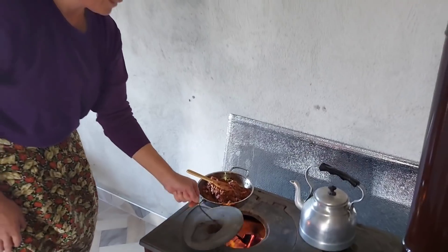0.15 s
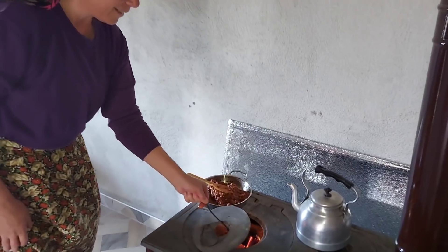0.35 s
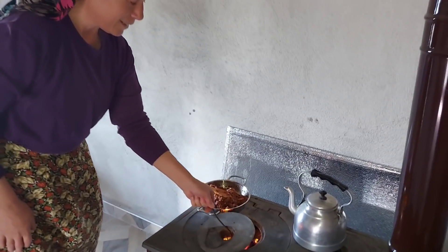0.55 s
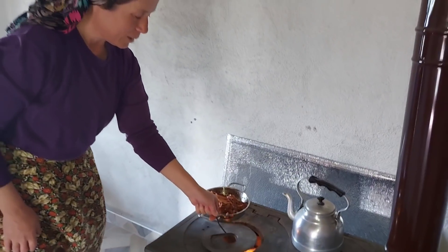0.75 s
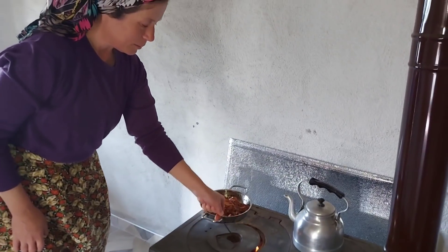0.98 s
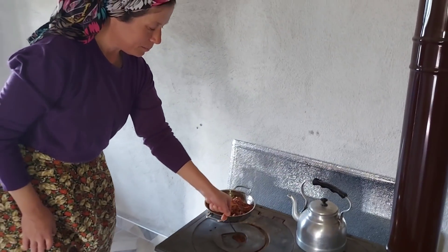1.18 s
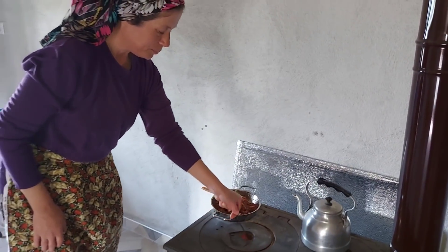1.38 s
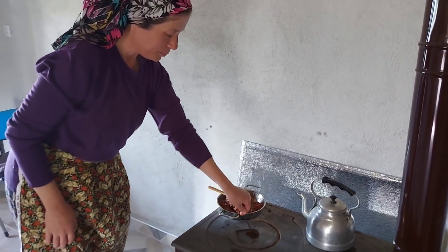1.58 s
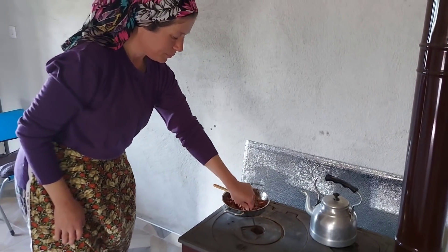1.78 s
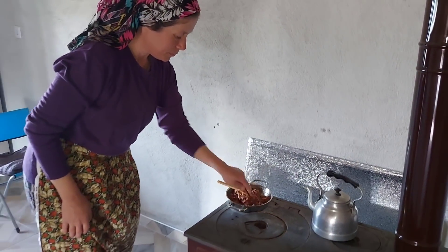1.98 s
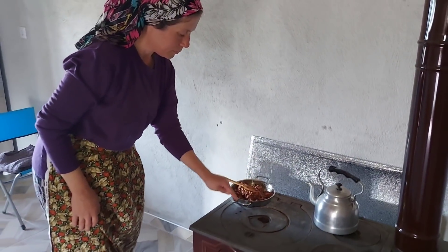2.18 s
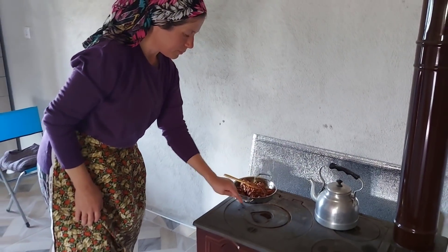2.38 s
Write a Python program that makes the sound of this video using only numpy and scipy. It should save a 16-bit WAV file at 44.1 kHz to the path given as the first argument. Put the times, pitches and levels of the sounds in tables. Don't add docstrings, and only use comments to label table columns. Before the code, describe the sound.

Loud rough iron scraping with one sharp bright clang and a run of lower knocks as a stove lid drops home, then faint metal touches and a short double pan knock, in a small reverberant room, miked nearby.

```python
import sys
import numpy as np
from scipy import signal
from scipy.fft import rfft, irfft, next_fast_len
from scipy.io import wavfile
from scipy.ndimage import uniform_filter1d

SR = 44100
rng = np.random.default_rng(int(sys.argv[2]) if len(sys.argv) > 2 else 0)


def invert_db(x):
    u = np.asarray(x, float) / 20
    return 10 ** u


def put_to_file(sound):
    columns = np.atleast_2d(sound).T
    safe = np.clip(columns, -1, 1)
    whole_steps = np.round(safe * 32767)
    wavfile.write(sys.argv[1], SR, whole_steps.astype(np.int16))


N = 108045
T = np.arange(N) / SR

# frequency in Hz, level in dB.
FIRE_SPECTRUM = [(50, 3), (120, 2), (320, -3.5), (500, -15.5), (1100, -33), (4000, -53.5), (12500, -43),
                 (16300, -58)]
FIRE_DB, FIRE_FADE_DB_PER_S = -51, -7
# start in seconds, level in dB.
TICKS = [
    (1.5727, -66),
    (1.7862, -63),
    (2.084, -76),
]
# start in seconds, level in dB, rise in seconds, hold in seconds,
# brightness in dB per octave.
HOOK_RUBS = [
    (1.62, -74, 0.014, 0.06, 14.5),
    (1.695, -68.5, 0.0049, 0.024, -1.5),
    (1.8, -64, 0.01, 0.0554, 2),
    (1.93, -73.5, 0.0039, 0.024, 8),
]
# frequency in Hz, width in Hz, level in dB.
HOOK_MODES = [(1066, 27.4, 4), (2080, 11.6, -0.5), (2040, 34, -6.5), (2460, 17, -9), (3960, 30, -19.5),
              (4370, 55, -16), (4340, 26, -7.5), (5006, 8.6, -15.5), (5810, 40, -10), (7500, 87, -19),
              (11800, 240, -20)]
# start in seconds, level in dB, rise in seconds, hold in seconds,
# brightness in dB per octave.
PAN_NUDGES = [
    (2.183, -75.5, 0.0099, 0.028, -5),
    (2.235, -86, .02, 0.0745, -5),
    (2.338, -63, 0.005, .012, 1.5),
    (2.3565, -46.5, 0.00044, 0.0065, 12.5),
    (2.371, -43, 0.0041, .002, 13.5),
    (2.378, -36.5, 0.00087, 0.0077, -3.5),
    (2.392, -34.5, 0.0012, 0.0053, -6.5),
    (2.408, -57, 0.003, .008, -21),
    (2.43, -50, 0.0036, .03, -17),
]
# frequency in Hz, width in Hz, level in dB.
PAN_MODES = [(845, 87, -7), (1410, 70, -31), (2074, 34, 0), (2610, 22, 5.5), (3768, 40, 7),
             (4230, 53, -0.5), (4840, 26, -4), (5840, 72, 3.5), (7860, 120, -13.5), (8200, 67, -10),
             (10170, 100, -14), (11850, 110, -17)]
# frequency in Hz, level in dB.
PAN_SCRAPE = [(240, -39), (400, -29.5), (3200, -15.5), (5680, -7.5), (15600, -25.5), (16300, -7)]
PAN_SCRAPE_DB, RELEASE_S = 1, 0.0034
HOOK_WIDEN, PAN_WIDEN = 6, 5

# time in seconds, boom of the box in dB, weight on the plate in dB,
# grit under the edge in dB.
DRAG = [(0, -63, -47, -61), (.07, -45, -50.5, -64), (.12, -32.5, -44, -87), (0.191, -32.5, -27, -40),
        (0.238, -56, -26.5, -39.5), (.3, -35.5, -22.5, -55), (0.419, -25.5, -28.5, -37.5),
        (.6, -43.5, -38.5, -55.5), (.7, -48, -38, -58), (0.768, -37.5, -28, -44.5), (.86, -37, -31.5, -86),
        (0.93, -33.5, -26.5, -33), (1.021, -38, -52, -52.5), (1.122, -52, -47, -77),
        (1.188, -34.5, -40, -45), (1.324, -41, -42, -58), (1.399, -49.5, -57, -104.5),
        (1.552, -52, -61.5, -80.5)]
GRAINS_PER_S, GRAIN_SPREAD_DB, LIFT_DB_PER_S = 2500, 5, 60
# start in seconds,
# clang in dB, extra brightness in dB, thud in dB, thud pitch in Hz.
CATCHES = [(0.069, -42, 4, -40.5, 596), (0.085, -46.5, 3, -20.5, 590), (0.123, -29.5, 5.5, -24, 747),
           (.31, -4.5, 11, -13.5, 595), (0.474, -35, 13.5, -23, 680), (0.541, -35.5, 5.5, -54.5, 394),
           (0.654, -38.5, 10, -26.5, 970), (0.691, -41, 12.5, -25, 980), (0.711, -28, -12, -30.5, 910),
           (0.745, -22.5, -2, -40.5, 890), (0.783, -18.5, 8.5, -30.5, 284), (0.8788, -16, 2.5, -23, 280),
           (0.926, -14.5, 5.5, -18.5, 280), (1.022, -48.5, -6.5, -19, 280), (1.164, -49, -15, -46.5, 501),
           (1.18, -25, -20, -28, 880), (1.205, -29, -32, -24, 288), (1.404, -48.5, -15.5, -38, 398),
           (2.187, -57.5, -5, -49.5, 628), (2.249, -69.5, 5.5, -47.5, 485)]
CHATTER_S, BRIGHT_HZ = .0075, 6700
THUD_S, THUD_SPREAD_OCT = 0.011, 0.36
# frequency in Hz, level in dB, t60 in seconds.
STOVE_MODES = [(70, -13.5, 0.23), (99.6, -6, 0.63), (137.9, 1.5, .1), (188, -19.5, 0.073),
               (248, -19, 0.031), (280, 1, 0.098), (355, 1, 0.028), (422.7, -7, 0.062), (590, -11.5, 0.06),
               (674, -8, 0.02), (865, 2, 0.016), (901.4, -14.5, 0.048), (1044, -7, 0.039),
               (1380, -5.5, 0.016)]
BOX_TOP_HZ = 210
# frequency in Hz, level in dB.
RASP_SPECTRUM = [(150, -27.5), (350, 2), (700, -1.5), (1300, -6.5), (2500, -12), (5000, -38.5)]
RASP_DB = -9.5
# start in seconds, level in dB, frequency in Hz, t60 in seconds.
BITES = [(.004, -37.5, 574, 0.022), (.04, -47, 594, 0.058), (.073, -55, 4600, 0.017),
         (.125, -40.5, 11550, .02), (.3105, -17, 9190, 0.031), (.312, -13, 4450, .03),
         (.314, -16.5, 2860, 0.017), (.312, -21.5, 1710, 0.027), (.312, -25.5, 10200, 0.032),
         (.48, -58, 3440, .04), (.542, -38, 8920, 0.05), (.655, -39, 12660, 0.036),
         (.69, -31.5, 882, 0.035), (.784, -18.5, 3450, 0.01), (.786, -26, 1590, 0.022),
         (.788, -32, 5540, 0.024), (.881, -29.5, 2040, 0.026), (.882, -35, 4130, 0.036),
         (.927, -22.5, 2380, 0.016), (.928, -17.5, 4030, 0.0067), (.945, -28, 1935, 0.047),
         (.965, -27, 1660, 0.022), (1.182, -34.5, 2060, 0.022), (1.27, -46, 869, .04),
         (1.31, -41, 1720, 0.034), (2.2, -50, 652, .06), (2.24, -52.5, 656, 0.041), (2.285, -51, 640, .06),
         (2.205, -46.5, 385, .08), (2.25, -45.5, 389, 0.056), (1.182, -35, 880, 0.051),
         (.783, -21, 3960, .002), (.927, -20, 2960, 0.0012), (.79, -21.5, 285.4, 0.18)]
BITE_S = 0.0047
# frequency in Hz, level in dB, t60 in seconds.
METAL_MODES = [(1647, -12, .1), (2020, -12, .1), (2283, -11, .1), (2875, -8, .1), (3413, -8, .1),
               (3520, -9, .1), (3941, -10, .1), (4407, -9, .08), (4742, -8, .12), (5577, -4, .12),
               (5830, -8, .1), (7407, -9, .1), (8083, -6, .12), (8995, 0, .1),
               (9950, -3, .07), (10350, -6, .07), (10690, -10, .07), (10975, -8, .08), (11430, -10, .08),
               (12125, -5, .1), (13200, -8, .08), (13920, -11, .06), (14300, -8, .09), (15480, -6, .12)]
LID_RING_DB, GRIT_RING_DB = -15, -20
# frequency in Hz, level in dB.
CLANG_SPECTRUM = [(400, -13), (800, -4), (2100, -3.5), (3100, -7.5), (4400, -5), (6600, -14.5), (9500, -19),
                  (16300, -26.5)]
WANDER_DB, WANDER_HZ = 3, 16

# frequency in Hz, t60 in seconds.
ROOM_T60 = [(60, 0.12), (300, 0.63), (1000, 0.54), (4000, 0.21), (14000, 0.215)]
# frequency in Hz, side against mid in dB.
WIDTH = [(60, -21.5), (200, -14), (500, -6.5), (1000, 0), (12000, -0.5)]
ROOM_DB, ROOM_GAP_S = 4.5, 0.0019
PLACES, PLACE_S, EVEN_HZ = 4, .07, 50
LEFT_LAG_S, LEFT_DB = 0.000098, -0.44
# frequency in Hz, level in dB.
PORTS = [(60, 1), (130, -0.5), (290, 2), (640, 1), (1410, 4), (3100, -1), (6820, -1), (15000, 4.5)]
MIC_LOW_HZ, MIC_TOP_HZ, PEAK_LIMIT = 54, 16150, .86


def rms_one(x):
    return x / np.sqrt(np.mean(x ** 2) + 1e-20)


def at_hz(points, hz):
    p = np.array(points)
    return np.interp(np.log(np.maximum(hz, 1)), np.log(p[:, 0]), p[:, 1])


def colour(x, spectrum):
    size = next_fast_len(N + 4096)
    gain = invert_db(at_hz(spectrum, np.fft.rfftfreq(size, 1 / SR)))
    return irfft(rfft(x, size) * rms_one(gain), size)[..., :N]


def drift(rate_hz):
    r = np.exp(-2 * np.pi * rate_hz * 40 / SR)
    white = rng.standard_normal(N // 40 + 2002)
    slow = signal.lfilter([1], [1, -2 * r, r * r], white)[2000:]
    return np.interp(np.arange(N) / 40, np.arange(len(slow)), rms_one(slow))


def wander():
    return invert_db(WANDER_DB * drift(WANDER_HZ))


def ring(x, hz, t60):
    r = invert_db(-60 / (max(t60, .0005) * SR))
    w = 2 * np.pi * hz / SR
    return signal.lfilter([0, np.sin(w)], [1, -2 * r * np.cos(w), r * r], x + 1e-18)


def grains():
    size_db = GRAIN_SPREAD_DB * np.minimum(rng.exponential(1, N), 4)
    sizes = invert_db(size_db) * rng.choice([-1, 1], N)
    return rms_one(sizes * (rng.random(N) < GRAINS_PER_S / SR))


def spread(mid, side):
    size = next_fast_len(len(mid) + 4096)
    width = invert_db(at_hz(WIDTH, np.fft.rfftfreq(size, 1 / SR)))
    side = irfft(rfft(side, size) * width, size)[:len(mid)]
    return np.array([mid + side, mid - side])


def fire():
    mid, side = colour(rng.standard_normal((2, N)), FIRE_SPECTRUM)
    flicker_db = 1.5 * drift(12.0)
    fade_db = FIRE_FADE_DB_PER_S * (np.clip(T, 1.3, 2.05) - 2)
    return invert_db(FIRE_DB + fade_db + flicker_db) * spread(mid, side)


def ticks():
    snaps = np.zeros(N)
    for s, db in TICKS:
        snaps[int(s * SR)] = invert_db(db + 9.5)
    return np.diff(ring(snaps, 11740, 0.002) + ring(snaps, 8020, 0.001) * .5, prepend=0)


def rubbed(strokes, modes, widen):
    rub = rng.standard_normal(N) + .5 * grains()
    envelopes = []
    for s, db, rise_s, hold_s, tilt_db in strokes:
        attack = np.clip((T - s) / rise_s, 0, 1)
        release = np.clip((s + rise_s + hold_s - T) / RELEASE_S + 1, 0, 1)
        envelopes.append((invert_db(db) * attack * release, tilt_db))
    rings = 0
    for hz, width_hz, db in modes:
        force = sum(e * invert_db(tilt_db * np.log2(hz / 2500)) for e, tilt_db in envelopes)
        t60 = 2.2 / (width_hz * widen)
        rings = rings + invert_db(db - 24) * ring(rub * force, hz, t60)
    return rings, rub * sum(e for e, _ in envelopes)


def hook():
    rings, _ = rubbed(HOOK_RUBS, HOOK_MODES, HOOK_WIDEN)
    return invert_db(3.5) * rings


def pan():
    rings, rub = rubbed(PAN_NUDGES, PAN_MODES, PAN_WIDEN)
    return rings + invert_db(PAN_SCRAPE_DB) * colour(rub, PAN_SCRAPE)


def dragged(column):
    rows = np.array(DRAG)
    level_db = np.interp(T, rows[:, 0], rows[:, column])
    return invert_db(level_db - LIFT_DB_PER_S * np.maximum(T - rows[-1, 0], 0))


def bursts(levels_db, decay_s):
    starts = np.full(N, 1e-18)
    starts[(np.array(CATCHES)[:, 0] * SR).astype(int)] = invert_db(levels_db)
    return signal.lfilter([1], [1, -np.exp(-1 / (decay_s * SR))], starts)


def stove():
    *_, thud_db, thud_hz = np.transpose(CATCHES)
    box, plate = (dragged(column) * grains() for column in (1, 2))
    noise = rng.standard_normal(N)
    out = invert_db(RASP_DB) * colour(plate, RASP_SPECTRUM)
    for hz, db, t60 in STOVE_MODES:
        off_pitch_db = 6 * (np.log2(hz / thud_hz) / THUD_SPREAD_OCT) ** 2
        thud = noise * bursts(thud_db - db - off_pitch_db, THUD_S)
        weight = box if hz < BOX_TOP_HZ else plate
        out = out + ring((weight * wander() + thud) * invert_db(db - 30), hz, t60)
    return out


def bites():
    noise = rng.standard_normal((len(BITES), SR // 20)) * np.exp(-T[:SR // 20] / BITE_S)
    out = np.zeros(N + SR)
    for (s, db, hz, t60), burst in zip(BITES, noise):
        sound = ring(np.pad(burst, (0, SR // 5)), hz, t60)
        out[int(s * SR):][:len(sound)] += invert_db(db) * sound / np.abs(sound).max()
    return out[:N]


def lid():
    grit = dragged(column=3) * grains()
    _, clang_db, bright_db, _, _ = np.transpose(CATCHES)
    noise = invert_db(-9) * (rng.standard_normal(N) + 1.03 * grains())
    blows = 0
    for kind, db in (("low", clang_db), ("high", clang_db + bright_db)):
        split = signal.butter(1, BRIGHT_HZ, kind, fs=SR, output="sos")
        blows = blows + signal.sosfilt(split, noise * bursts(db, CHATTER_S))
    drive = invert_db(GRIT_RING_DB) * grit + invert_db(LID_RING_DB) * blows
    rings = sum(invert_db(db - 32.0) * ring(drive * wander(), hz, t60) for hz, db, t60 in METAL_MODES)
    return colour(grit + blows, CLANG_SPECTRUM) + rings


def room_tails():
    t, tails = T[:SR], 0
    edges_hz = 36 * 2 ** np.arange(0, 9.3, .5)
    white = rng.standard_normal((2, PLACES, 2, SR))
    onset = np.clip(t / ROOM_GAP_S - 1, 0, 1)
    for k, (low, high) in enumerate(zip(edges_hz, edges_hz[1:])):
        t60 = at_hz(ROOM_T60, np.sqrt(low * high))
        band_pass = signal.butter(2, [low, high], "band", fs=SR, output="sos")
        band = signal.sosfilt(band_pass, white[k % 2])
        tails = tails + band * invert_db(-60 * t / t60) * onset / np.sqrt(t60 * SR / 14)
    spectrum = rfft(tails)
    power = uniform_filter1d(np.abs(spectrum) ** 2, size=EVEN_HZ)
    return irfft(spectrum / np.sqrt(power + 1e-4), SR) * (t < .8)


def kitchen(x):
    wet = 0
    for k, tail in enumerate(room_tails()):
        away = np.abs((T / PLACE_S - k + PLACES / 2) % PLACES - PLACES / 2)
        here = x * np.cos(np.pi / 2 * np.minimum(away, 1))
        wet = wet + signal.fftconvolve(here[None], spread(*tail), axes=1)[:, :N]
    left = invert_db(LEFT_DB) * np.interp(T - LEFT_LAG_S, T, x)
    return np.array([left, x]) + invert_db(ROOM_DB) * wet


def scene():
    metal = invert_db(-4) * (hook() + pan() + stove() + bites() + lid())
    return fire() + ticks() * invert_db([[2], [-2]]) + kitchen(metal)


def roll_off(x):
    return signal.sosfilt(signal.butter(12, 16480, fs=SR, output="sos"), x)


def record(dry):
    size = next_fast_len(N + 4096)
    half_db = at_hz(PORTS, np.fft.rfftfreq(size, 1 / SR)) / 2
    x = irfft(rfft(dry, size) * invert_db([half_db, -half_db]), size)[:, :N]
    x = signal.sosfilt(signal.butter(4, MIC_LOW_HZ, "high", fs=SR, output="sos"), x)
    x = x / (1 + (x / PEAK_LIMIT) ** 8) ** (1 / 8)
    x = signal.sosfilt(signal.cheby2(16, 70, MIC_TOP_HZ, fs=SR, output="sos"), x)
    return roll_off(x)


dry = scene()
out = record(dry)
put_to_file(out)
```